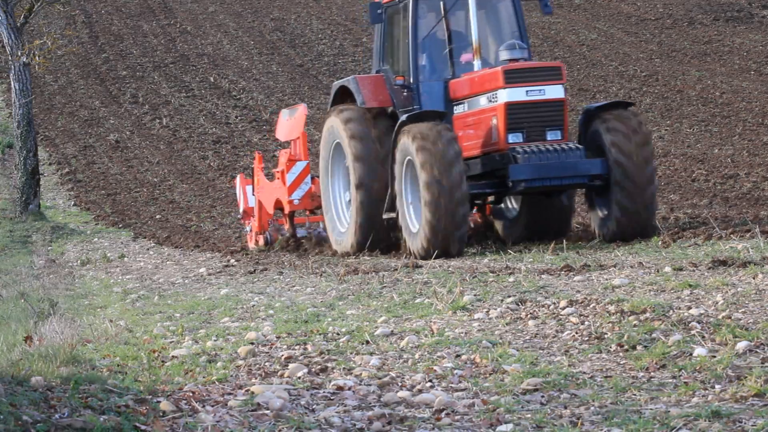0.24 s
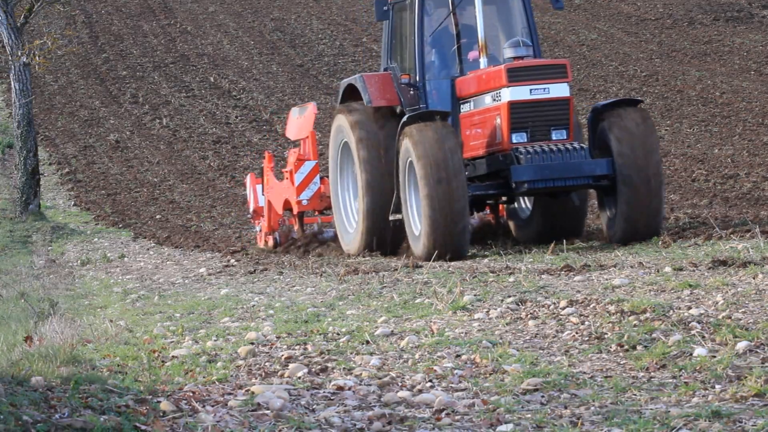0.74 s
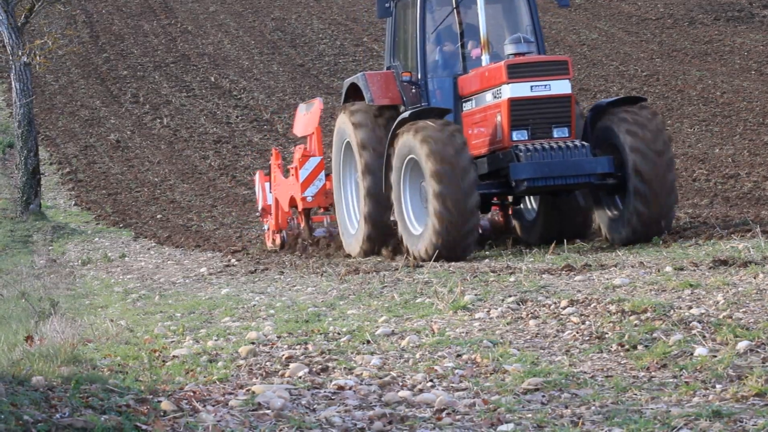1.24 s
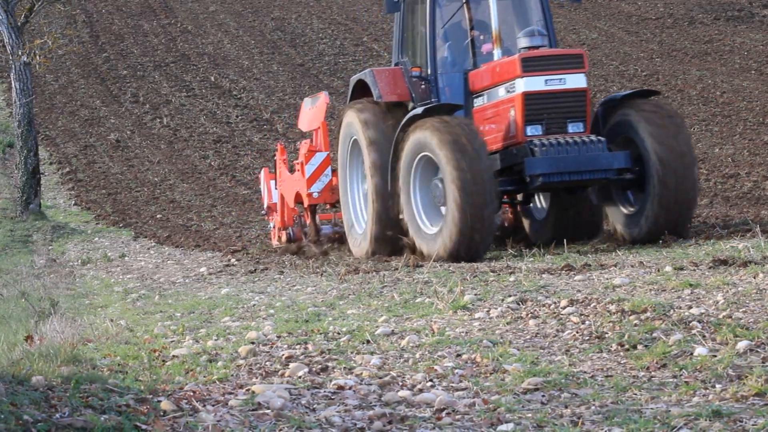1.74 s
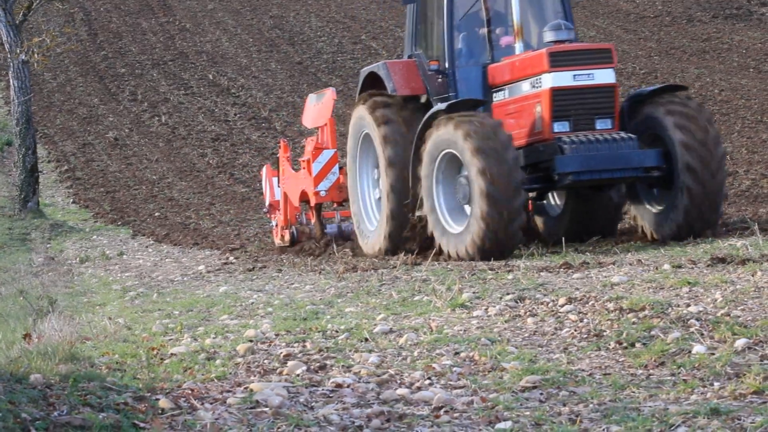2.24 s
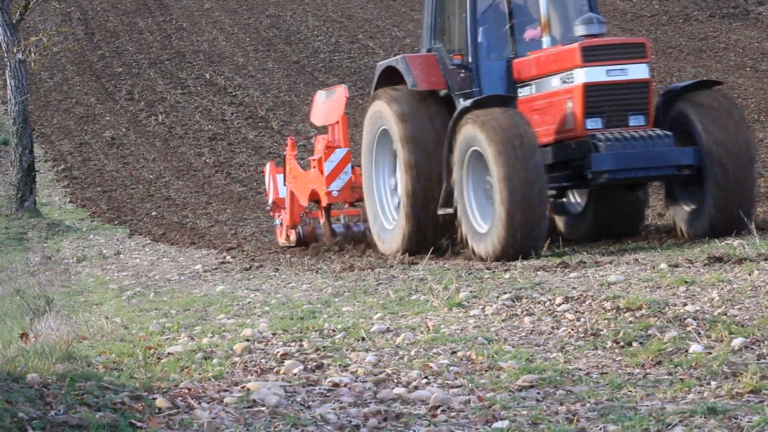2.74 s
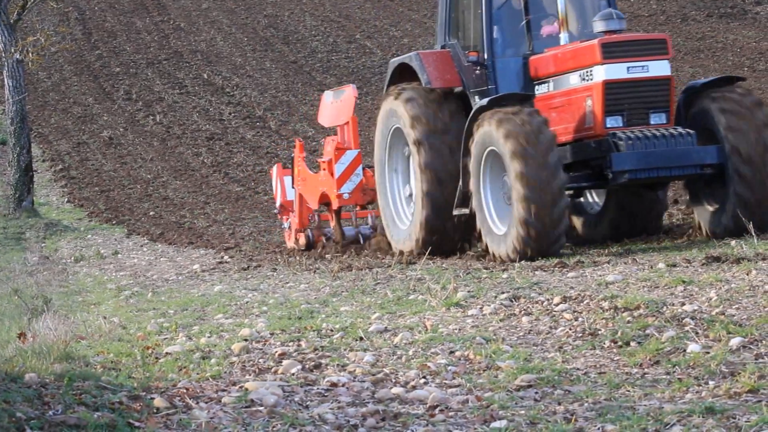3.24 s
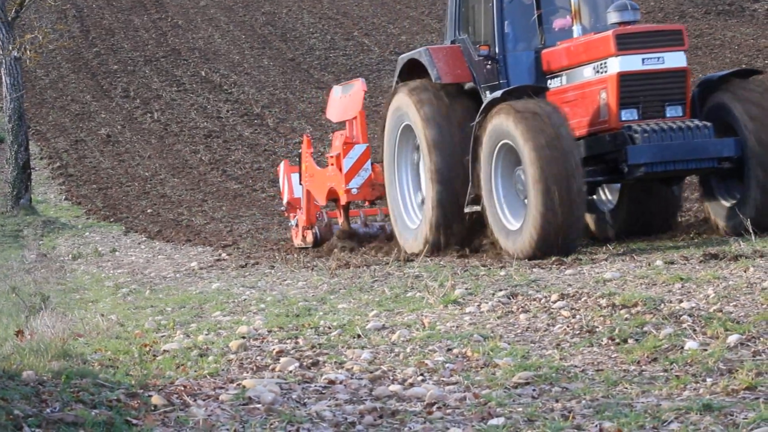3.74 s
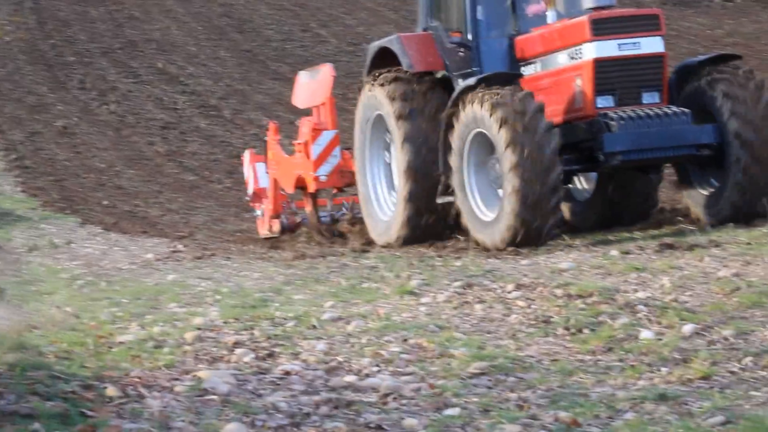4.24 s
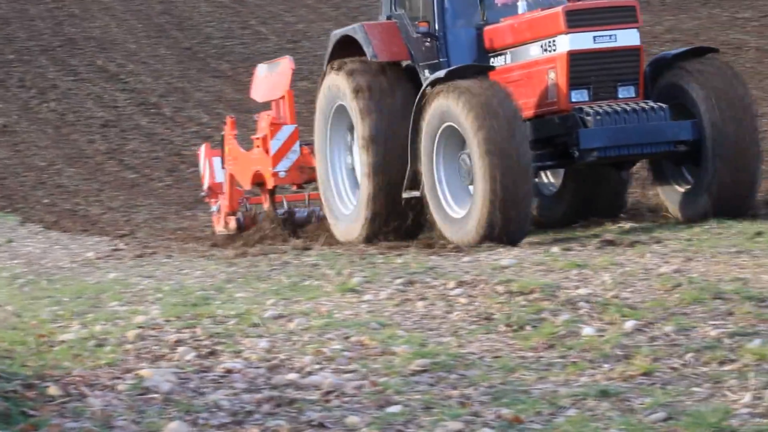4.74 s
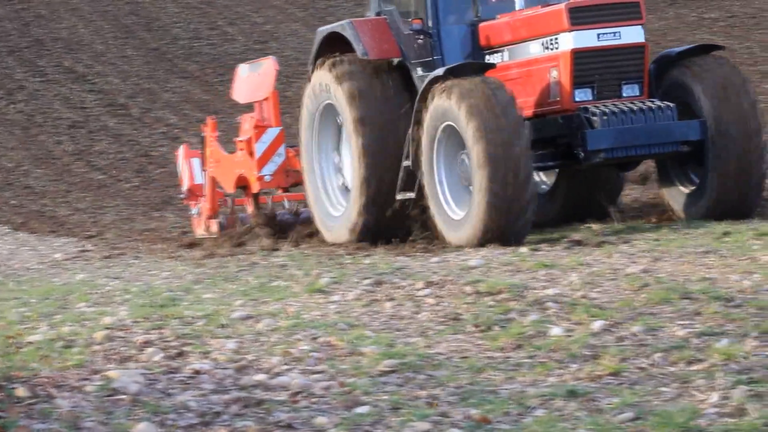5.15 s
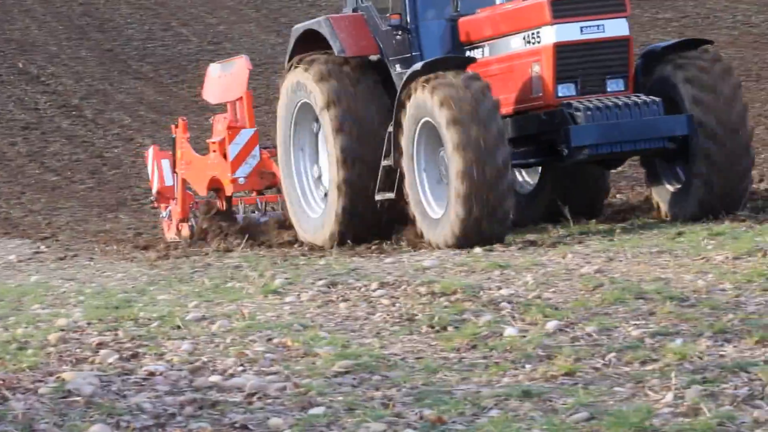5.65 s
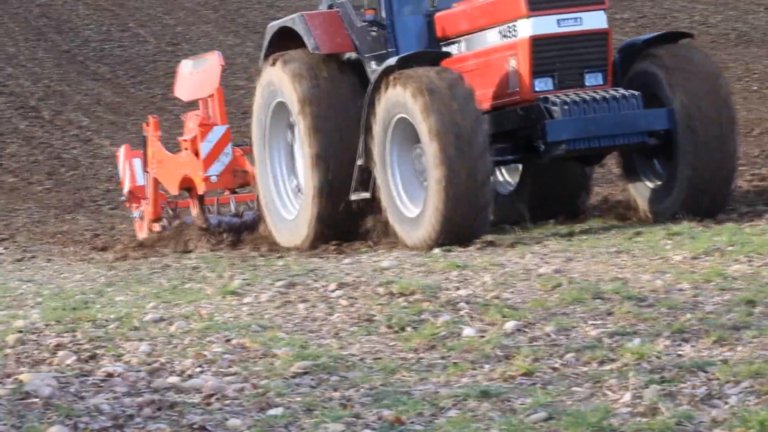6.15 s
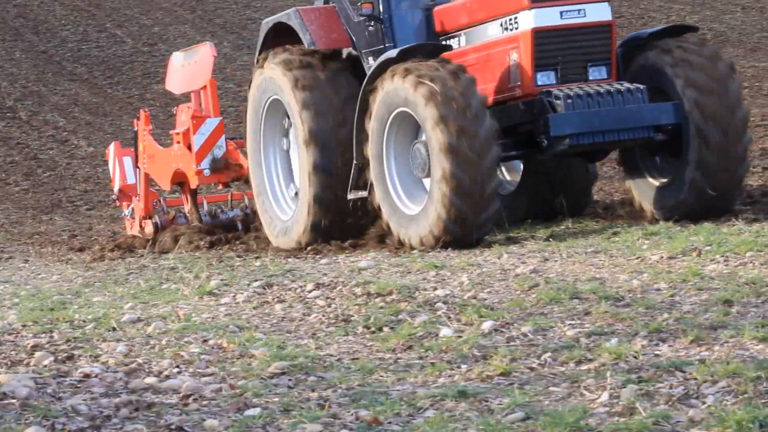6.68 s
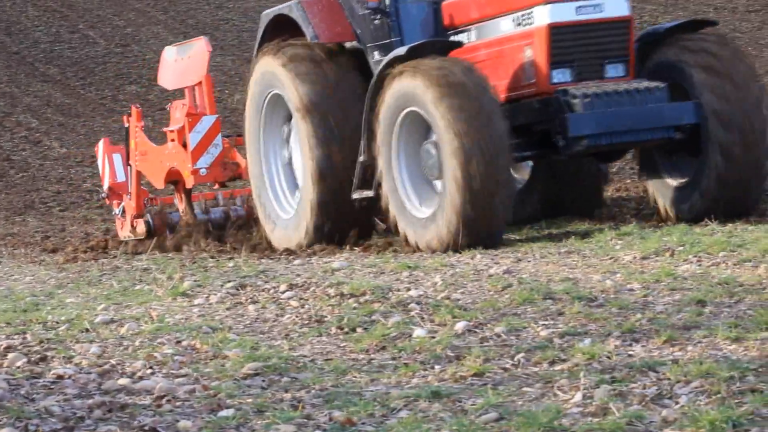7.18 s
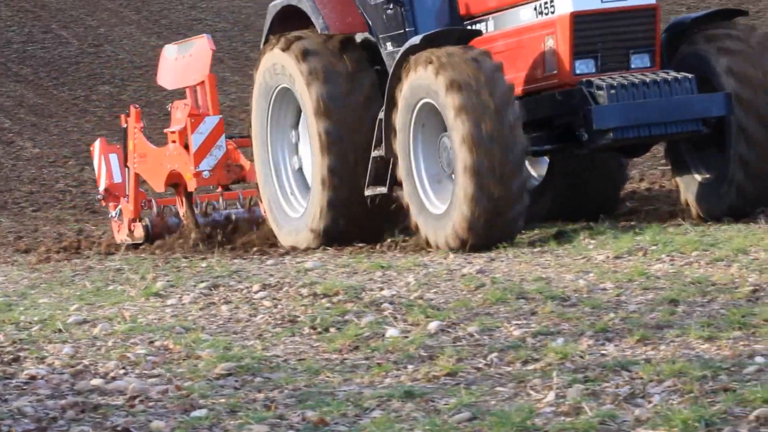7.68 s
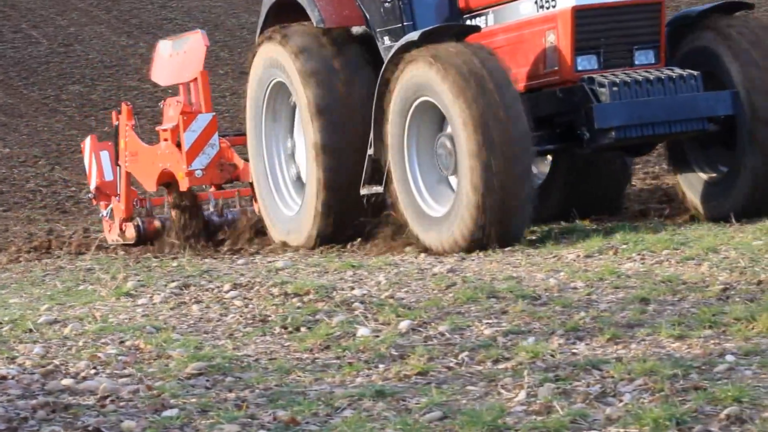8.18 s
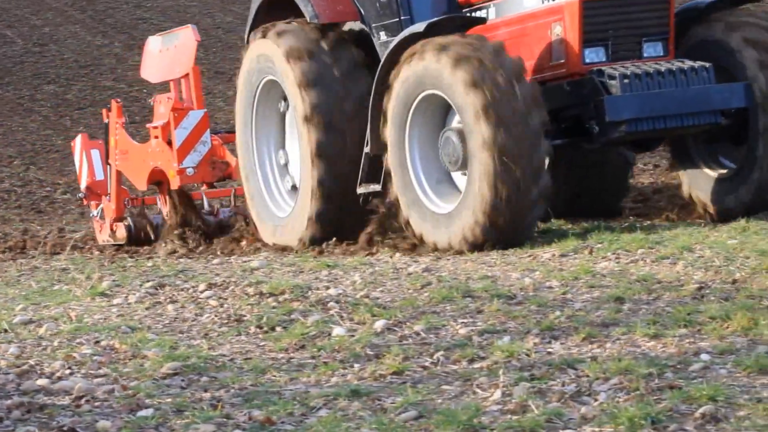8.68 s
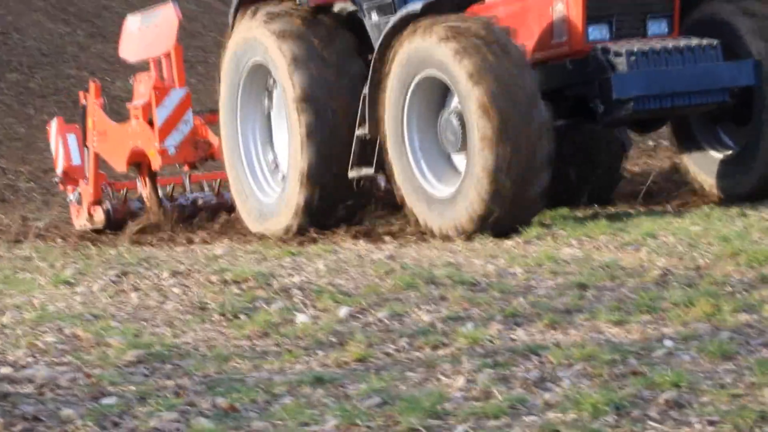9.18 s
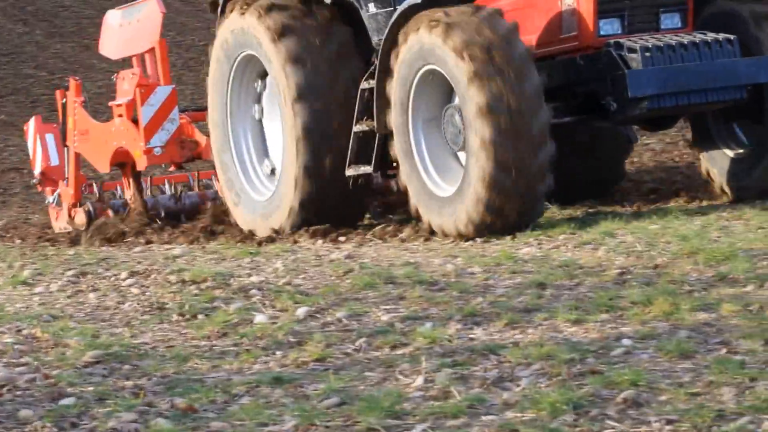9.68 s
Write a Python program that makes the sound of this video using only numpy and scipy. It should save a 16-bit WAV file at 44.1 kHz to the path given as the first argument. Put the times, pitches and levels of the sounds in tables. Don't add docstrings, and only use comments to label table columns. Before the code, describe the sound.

From 0 s a tractor's diesel engine is already working hard, a loud, steady low buzz near 95-100 Hz with a lumpy uneven beat and a raspy open-exhaust roar. It starts slightly softer and reaches full level by 0.3 s. The pitch drops a little around 1.7 s, recovers by 3.4 s, sags again near 4.5 and 7 s, rises around 8-8.6 s, then sinks to its lowest at the end. Small level dips come near 1.9, 3 and 4 s. Airy hiss flutters throughout, strongest around 1 s, and occasional firings crack harder, especially 4.5-6 s. Wind thumps the microphone before 0.8 s and repeatedly from 5 to 8 s. Fine crumbling soil grit slowly increases as the machine draws nearer, about 13 to 8 metres. Open field, little echo beyond the ground, light clipping; the engine is still running at 9.9 s.

```python
import sys
import numpy as np
from scipy import signal
from scipy.fft import rfft, irfft
from scipy.io import wavfile
from scipy.ndimage import uniform_filter1d, map_coordinates

SR = 44100
rng = np.random.default_rng(int(sys.argv[2]) if len(sys.argv) > 2 else 0)


def gain_from_db(level_db):
    decades = np.asarray(level_db, float) / 20
    return 10 ** decades


def to_wav(sig):
    pcm = np.clip(np.atleast_2d(sig), -1, 1) * 32767
    pcm = np.round(pcm).astype(np.int16)
    wavfile.write(sys.argv[1], SR, pcm.T)


N = 437472


def curve(table):
    seconds, values = np.transpose(table)
    return np.interp(np.arange(N) / SR, seconds, values)


def colour(x, points, dips=()):
    hz = np.arange(4097) * SR / 8192 + 1
    points_hz, points_db = np.transpose(points)
    db = np.interp(np.log(hz), np.log(points_hz), points_db)
    for dip_hz, width_hz, dip_db in dips:
        db = db + dip_db * np.exp(-((hz - dip_hz) / width_hz) ** 2)
    cepstrum = irfft(db * np.log(10) / 20)
    cepstrum[1:4096] *= 2
    cepstrum[4097:] = 0
    y = signal.fftconvolve(x, irfft(np.exp(rfft(cepstrum))))[:N]
    return y / np.sqrt(np.mean(y ** 2))


def walk(rate_hz):
    hold = int(SR / rate_hz)
    steps = np.repeat(rng.standard_normal(N // hold + 1), hold)
    y = uniform_filter1d(uniform_filter1d(steps, hold), hold)[:N]
    return y / y.std()


def swells(table, lull_db):
    t = np.arange(0, N, 64)[:, None] / SR
    mid_s, half_width_ms, peak_db = np.transpose(table)
    bells = np.exp(-.5 * (1000 * (t - mid_s) / half_width_ms) ** 2)
    power = gain_from_db(lull_db) ** 2 + (gain_from_db(peak_db) ** 2 * bells).sum(axis=1)
    return np.interp(np.arange(N) / SR, t[:, 0], 10 * np.log10(power))


# time in seconds, firing rate in Hz.
FIRING_RATE = [(0.0, 98.66), (0.863, 97.68), (0.95, 98.09), (1.697, 94.68), (2.692, 95.82), (2.76, 95.65),
               (3.367, 97.05), (3.785, 96.98), (4.19, 94.87), (4.724, 94.37), (5.69, 95.71), (6.707, 93.33),
               (6.977, 92.07), (7.932, 95.7), (7.991, 96.56), (8.594, 96.47), (9.371, 92.55), (9.92, 90.72)]


def firing_phase():
    return np.cumsum(curve(FIRING_RATE)) / SR + .1


# time in seconds, distance in m.
DISTANCE_M = [
    (0, 13.3),
    (.7, 13.2),
    (1.3, 12.5),
    (2.7, 12),
    (4.2, 11),
    (5.3, 10.3),
    (6.9, 9.8),
    (7.9, 8.8),
    (9.92, 7.7),
]


def approach_m():
    return curve(DISTANCE_M)


# time in seconds, loudness in dB.
LOUDNESS = [(0, -15.5), (.25, -11), (.9, -11.5), (1.1, -11.5), (1.6, -11), (1.9, -13), (2.8, -11),
            (3.05, -13), (3.3, -11.5), (3.9, -10.5), (4.02, -13), (4.4, -11), (5.3, -10.5), (5.8, -11),
            (7.15, -11.5), (7.5, -11), (9, -11.5), (9.9, -11)]


def ridden_loudness_db():
    return curve(LOUDNESS)


# middle in seconds, half-width in ms, peak in dB.
AIR_EDDIES = [(0.208, 120, -28.5), (0.641, 132, -30), (0.989, 52, -24), (1.522, 220, -27.5),
              (1.631, 11, -26), (2.226, 360, -26), (2.926, 58, -26.5), (3.235, 88, -27.5),
              (3.512, 130, -28.5), (3.906, 62, -25.5), (4.255, 120, -32), (4.39, 27, -25.5),
              (4.728, 86, -30.5), (4.839, 500, -32), (5.383, 42, -34), (5.898, 41, -30), (6.178, 107, -27),
              (6.445, 25, -33), (6.765, 143, -27.5), (7.089, 45, -29.5), (7.522, 210, -29),
              (7.927, 24, -29), (8.13, 220, -30.5), (8.388, 15, -29.7), (8.649, 100, -30.5),
              (8.928, 88, -27), (9.357, 25, -29), (9.68, 310, -28.5)]


def air_treble_db():
    return swells(AIR_EDDIES, lull_db=-37)


def tone(phase, *orders_db):
    turns_rad = (0, np.pi, 0)
    wobble = gain_from_db(.5 * walk(25))
    out = np.zeros(N)
    for k, db in enumerate(orders_db):
        out += 2 ** .5 * gain_from_db(db) * np.cos(2 * np.pi * (k + 1) * phase + turns_rad[k])
    return wobble * out


# multiple of the turn rate, level in dB.
CRANK_ORDERS = [(4, -43), (5, -46), (7, -37), (8, -35), (10, -37), (11, -33), (12, -39), (13, -31),
                (14, -27), (15, -39), (16, -34), (17, -28), (18, -45), (19, -35), (20, -38), (21, -42),
                (22, -49), (23, -52), (24, -44), (25, -35), (26, -41), (27, -43), (28, -39), (29, -43),
                (30, -54), (31, -50), (32, -46)]


def lope(phase):
    knots = np.linspace(0, N, 24)
    turn_rad = 2 * np.pi * (phase - .5) / 3
    families_rad = 2 * np.pi * rng.random(3)
    out = np.zeros(N)
    for order, db in CRANK_ORDERS:
        drift_db = .8 * rng.standard_normal(len(knots))
        level = np.interp(np.arange(N), knots, gain_from_db(db + 2.5 + drift_db))
        stray_rad = 1.1 * rng.standard_normal()
        out += level * np.cos(order * turn_rad + families_rad[order % 3] + stray_rad)
    return out


# lateness in ms, level in dB.
MANIFOLD = [(1.3, 0), (-.9, 1), (.2, -1), (1.4, -2.5), (-.8, 2.5), (.1, -1.5)]
# time in seconds, extra level in dB.
LOUD_FIRINGS = [(.47, 6), (3.463, 5), (4.494, 5), (4.97, 5), (5.162, 5), (5.286, 5), (5.665, 6), (5.726, 5),
                (5.789, 5), (5.946, 6), (8.487, 6), (8.895, 7), (9.214, 4), (9.8, 5)]


def cylinder_pulses(phase):
    firing = phase.astype(int)
    count = firing[-1] + 1
    late_ms, level_db = np.array(MANIFOLD)[np.arange(count) % len(MANIFOLD)].T
    level_db = level_db - level_db.mean()
    for s, extra_db in LOUD_FIRINGS:
        level_db[firing[int(s * SR) + 60]] += extra_db
    return late_ms, level_db


# frequency in Hz, level in dB.
ROAR_COLOUR = [(150, -7), (250, 4.5), (400, 6), (600, 8), (900, 3.5), (1400, 6.5), (2000, 1.5), (2800, 0.5),
               (3600, -9), (5000, -21.5), (8000, -59), (14000, -78)]
# frequency in Hz, level in dB.
HISS_COLOUR = [(2000, -18.5), (3200, -6), (4200, 2.5), (6000, -1), (8000, -8), (9500, -8.5), (11000, -21.5),
               (12500, -32), (14000, -38), (15200, -45), (17000, -74)]
# frequency in Hz, width in Hz, level in dB.
STACK_DIPS = [(318, 72, -6.5), (446, 57, 1.5), (728, 66, -11.5), (1169, 82, -14), (1425, 78, -2.5),
              (5140, 120, -9)]


def jet(phase, roar_db, hiss_db):
    firing = phase.astype(int)
    late_ms, cylinder_db = cylinder_pulses(phase)
    count = len(cylinder_db)
    late_chance, crack_chance, flare_chance, hiss_chance = np.clip(rng.standard_normal((4, count)), -1.8, 1.8)

    opens = np.interp(np.arange(count) + .3624, phase, np.arange(N))
    opens = opens + (late_ms + .069 * late_chance) * SR / 1000
    cracks = np.zeros(N)
    cracks[np.clip(opens.astype(int), 0, N - 1)] = -gain_from_db(cylinder_db + 1.8 * crack_chance)
    cracks = colour(cracks, [(1000, 0), (1600, -9), (3000, -18)])
    cracks = colour(cracks, ROAR_COLOUR, STACK_DIPS)

    def flare(mid, sharpness):
        return np.exp(sharpness * (np.cos(2 * np.pi * (phase - mid)) - 1))

    roar_flare_db = .8 * cylinder_db + flare_chance
    hiss_flare_db = .5 * cylinder_db + .6 * flare_chance + 2.4 * hiss_chance
    roar_gate = .42 + flare(.47, 1.4) * gain_from_db(roar_flare_db)[firing]
    hiss_gate = .25 + flare(.38, 2.2) * gain_from_db(hiss_flare_db)[firing]
    gas = rng.standard_normal(N) * gain_from_db(1.07 * walk(900))
    roar = colour(gas * roar_gate, ROAR_COLOUR, STACK_DIPS) + gain_from_db(-9) * cracks
    hiss = colour(gas * gain_from_db(2.85 * walk(2500)) * hiss_gate, HISS_COLOUR, STACK_DIPS)
    return gain_from_db(roar_db + 1.5) * roar + gain_from_db(hiss_db) * hiss


def soil(x, metres):
    stack_height_m, microphone_height_m = 2.7, .7
    lag_ms = 2 * stack_height_m * microphone_height_m / metres / .343
    dull = signal.sosfiltfilt(signal.butter(2, 5000, fs=SR, output="sos"), x)
    dull = .7 * dull + .3 * x
    late = (lag_ms + .008 * walk(6)) * SR / 1000
    echo = map_coordinates(dull, [np.arange(N) - late], order=3, mode="nearest")
    strength = .57 - .022 * np.maximum(metres - 10, 0)
    return (x + strength * echo) / np.sqrt(1 + strength ** 2)


# frequency in Hz, level in dB.
CLOD_COLOUR = [(1500, -32), (3500, 6.5), (6000, 3), (9500, 2.5), (12000, -10), (14000, -22), (16000, -55),
               (20000, -86)]


def crumble(level_db, flutter_db):
    grit = rng.standard_normal(N) * gain_from_db(3.23 * walk(600) + walk(10))
    return gain_from_db(level_db + 1.15 * flutter_db) * colour(grit, CLOD_COLOUR)


# frequency in Hz, level in dB.
BUFFET_COLOUR = [(20, -21), (45, -9), (80, 1), (140, 2), (250, -0.5), (400, -10), (700, -15), (1500, -35),
                 (5000, -99)]
# middle in seconds, half-width in ms, peak in dB.
GUST_SWELLS = [(0.145, 46, -31.5), (0.38, 17, -28), (0.744, 85, -31), (1.127, 34, -33), (1.242, 15, -29),
               (1.607, 125, -39), (1.993, 39, -35.6), (2.696, 26.3, -35), (2.984, 34, -32),
               (3.197, 43, -32.5), (4.221, 41, -35), (4.495, 91, -53), (5.006, 14, -35),
               (5.181, 127, -34.5), (5.643, 87, -30), (6.208, 150, -32.8), (6.728, 28, -29),
               (7.087, 130, -32), (8.022, 45, -49), (8.168, 16, -43), (8.234, 300, -31.5),
               (9.137, 120, -36), (9.911, 22, -29), (9.996, 500, -45)]
# start in seconds, peak in dB, pitch in Hz.
WIND_THUMPS = [(0.078, -14, 221), (0.116, -15, 288), (0.605, -11, 223), (0.736, -12, 286), (0.77, -9, 221),
               (5.072, -11, 261), (5.595, -18, 221), (5.608, -9, 216), (5.689, -9, 221), (5.738, -10, 431),
               (5.751, -16, 480), (5.797, -10, 416), (6.083, -6, 275), (6.236, -20, 229), (6.337, -24, 258),
               (6.481, -12, 231), (6.665, -10, 266), (6.873, -12, 223), (6.933, -34, 221), (6.95, -13, 340),
               (7.104, -24, 221), (7.21, -8, 400), (7.525, -19, 300), (7.554, -5, 280), (7.622, -21, 248),
               (7.713, -9, 221), (7.79, -8, 270), (7.923, -9, 231), (7.938, -10, 304)]


def wind():
    lumpy = rng.standard_normal(N) * gain_from_db(2.1 * walk(40))
    buffet = colour(lumpy, BUFFET_COLOUR) * gain_from_db(swells(GUST_SWELLS, lull_db=-51) + 12.5)
    late_s, rise_cycles = .0039, .36
    t = np.arange(int(.05 * SR)) / SR
    for s, db, hz in WIND_THUMPS:
        i = int((s + late_s) * SR)
        rise = hz * t / rise_cycles
        puff = np.sin(2 * np.pi * hz * t) * rise * np.exp(1 - rise) * gain_from_db(db + 6.5)
        buffet[i:i + len(t)] += puff[:N - i]
    return buffet


def scene():
    phase, metres = firing_phase(), approach_m()
    ride_db, air_db = ridden_loudness_db(), air_treble_db()
    near_db = 20 * np.log10(metres[0] / metres)
    flutter_db = air_db - air_db.mean()

    second_near_db = -.89 * near_db
    hum = tone(phase, ride_db - 2, ride_db - 4 + second_near_db, ride_db - 17.5 + second_near_db)

    roar_db = -18.5 + ride_db - ride_db.mean() + .15 * near_db + .29 * flutter_db
    hiss_db = air_db + 2.5 - .2 * near_db
    stack = lope(phase) + jet(phase, roar_db, hiss_db)

    grit = crumble(-35.5 + 1.3 * near_db, flutter_db)
    return (hum + soil(stack, metres) + grit + wind())[None]


def top_cut(x):
    return signal.sosfilt(signal.butter(12, 15750, fs=SR, output="sos"), x)


def record(dry):
    low_pass = signal.ellip(8, .2, 60, 15750, fs=SR, output="sos")
    mix = signal.sosfilt(low_pass, np.clip(dry, -1, 1))
    return top_cut(mix)


dry = scene()
out = record(dry)
to_wav(out)
```